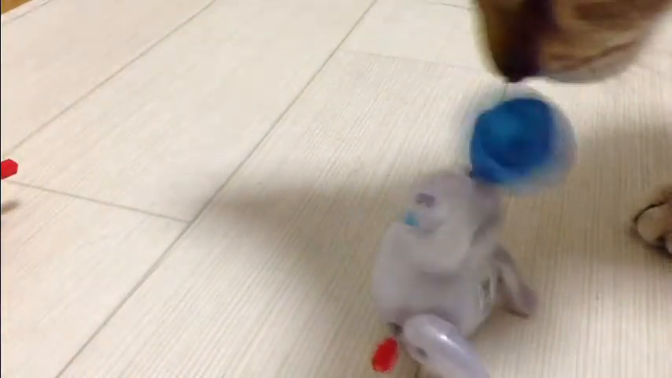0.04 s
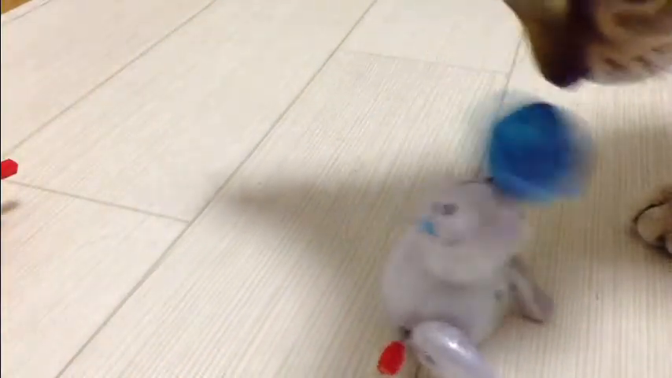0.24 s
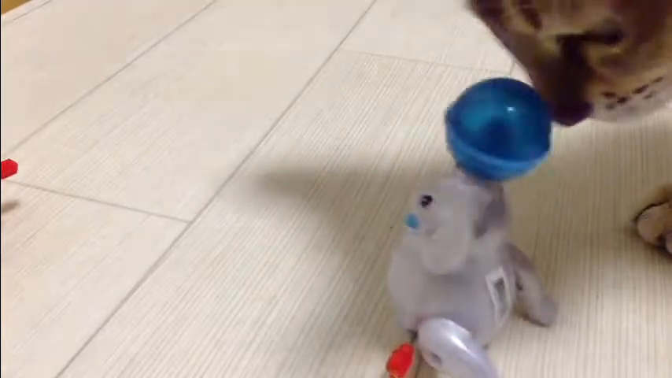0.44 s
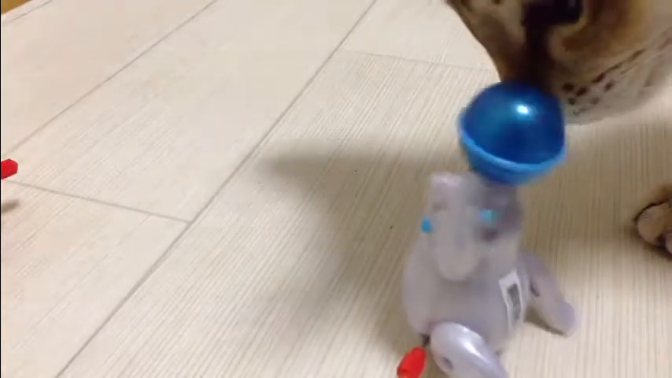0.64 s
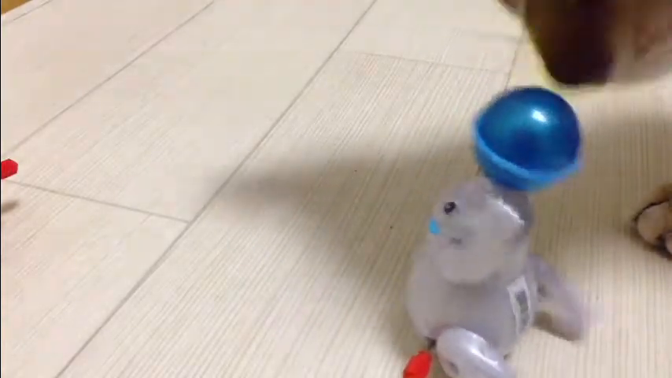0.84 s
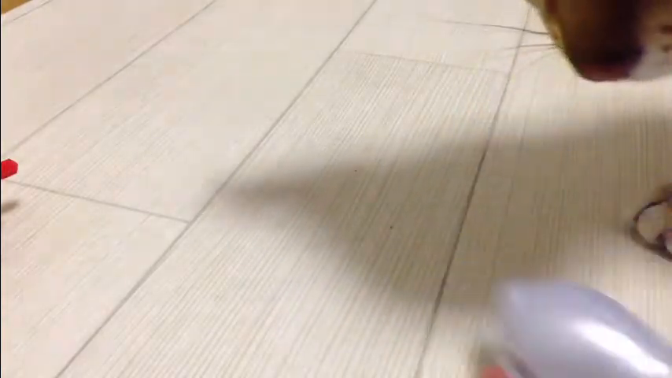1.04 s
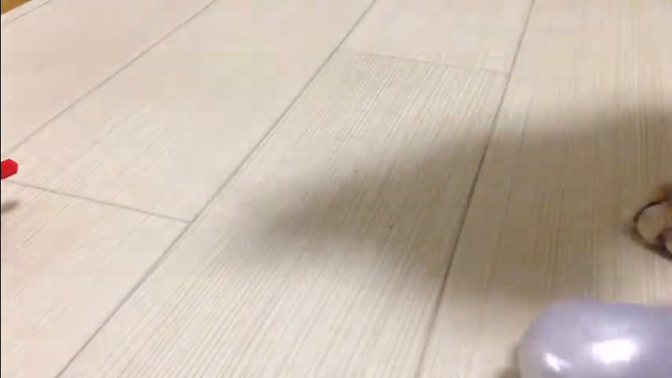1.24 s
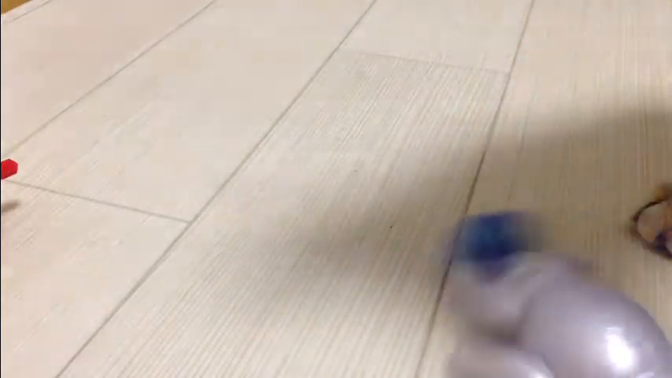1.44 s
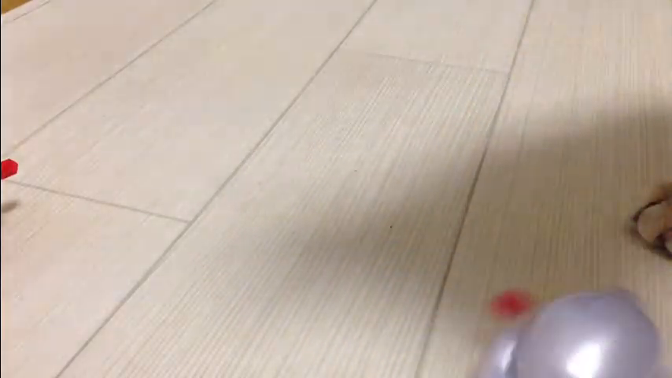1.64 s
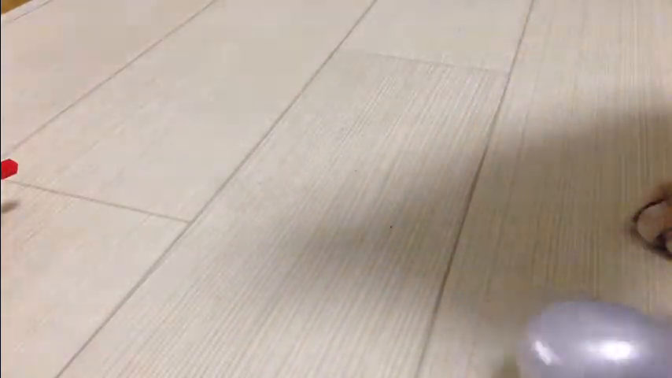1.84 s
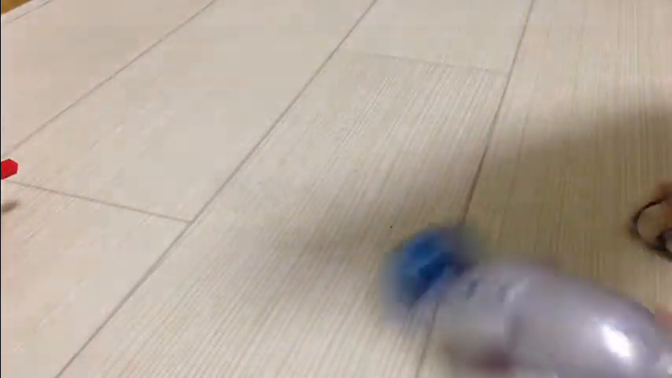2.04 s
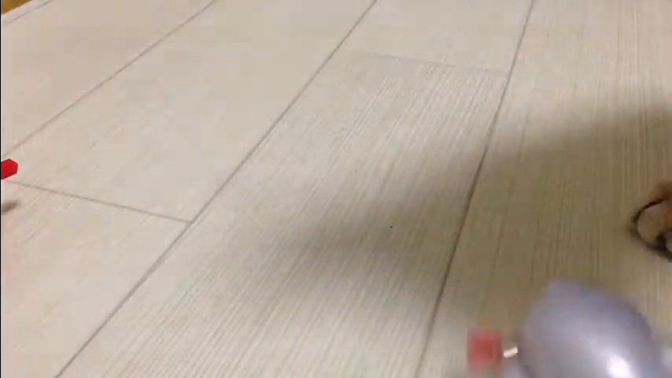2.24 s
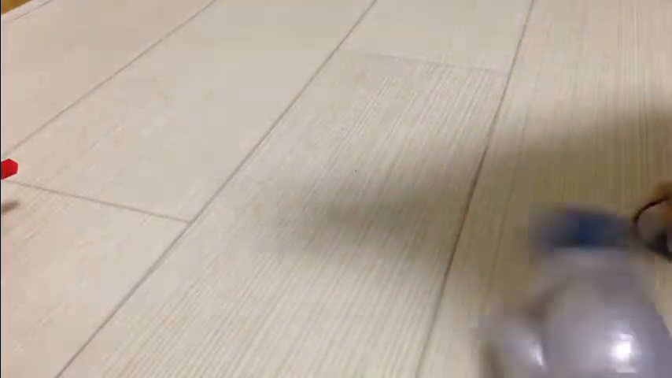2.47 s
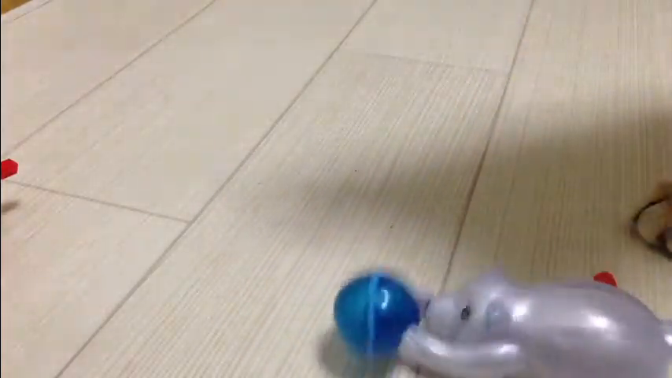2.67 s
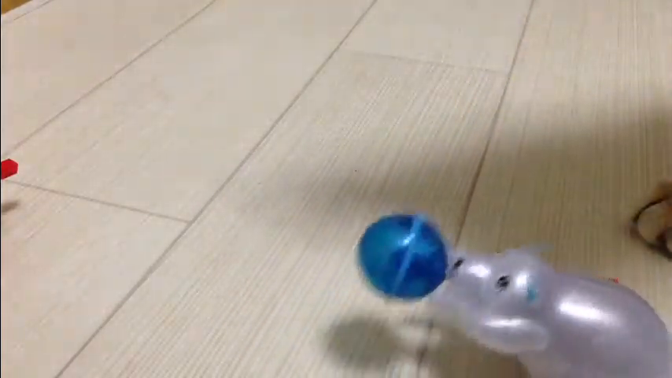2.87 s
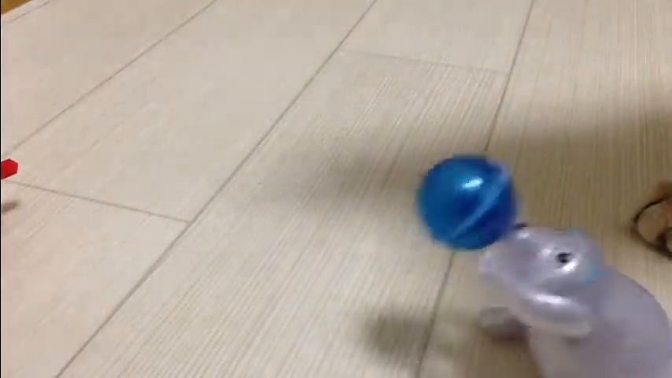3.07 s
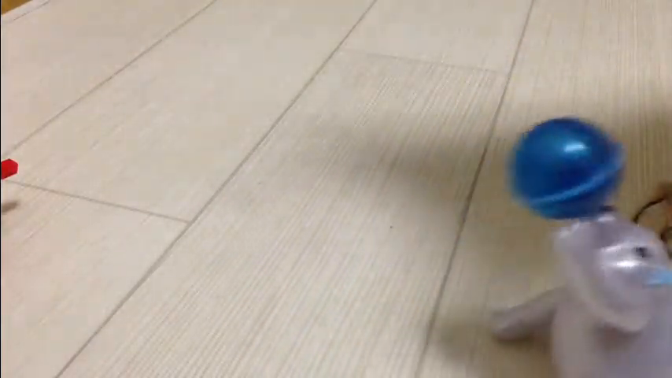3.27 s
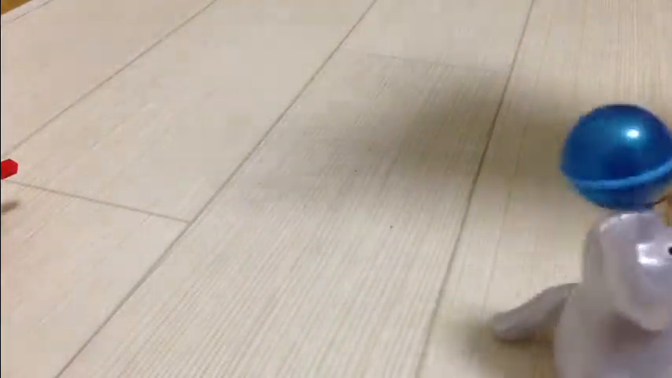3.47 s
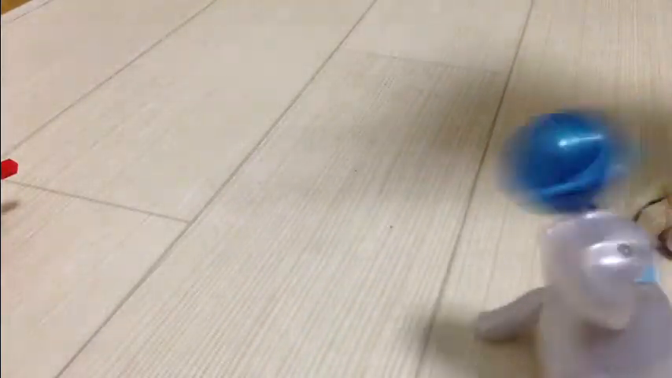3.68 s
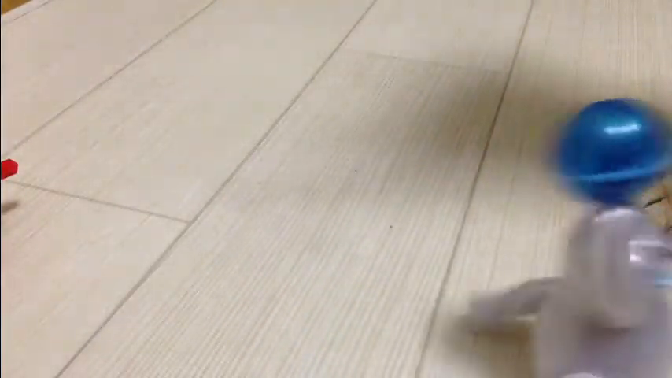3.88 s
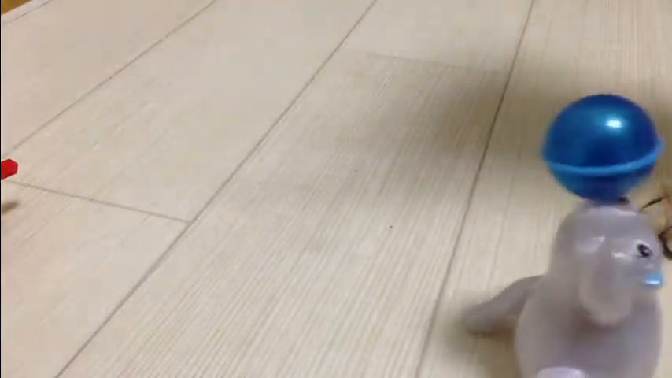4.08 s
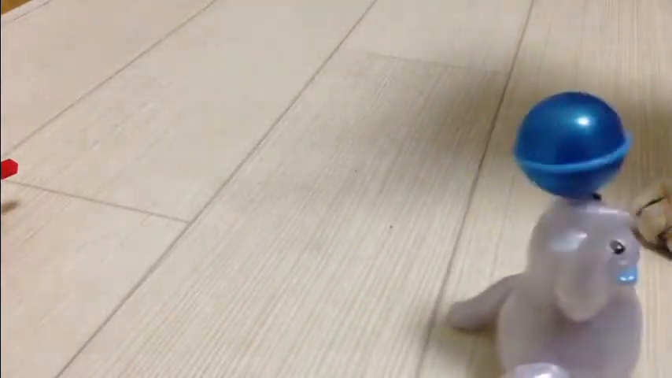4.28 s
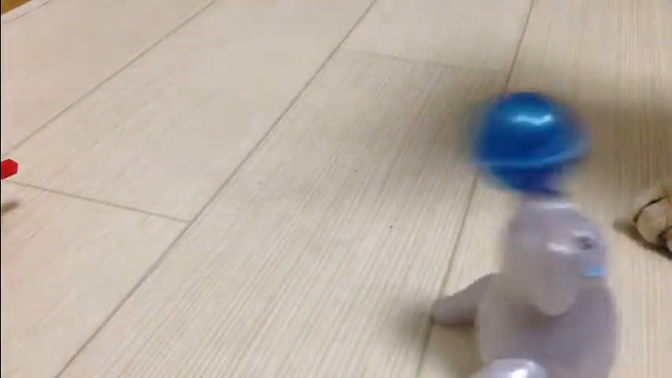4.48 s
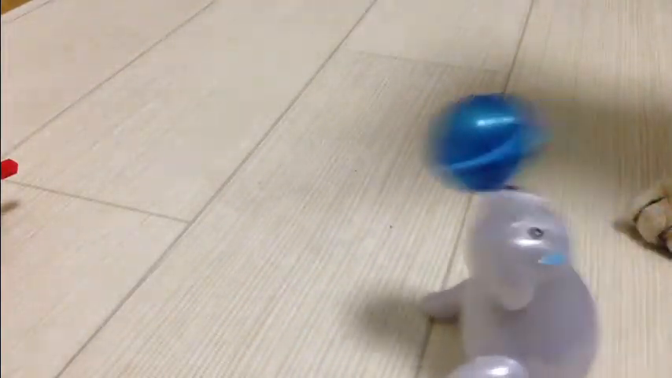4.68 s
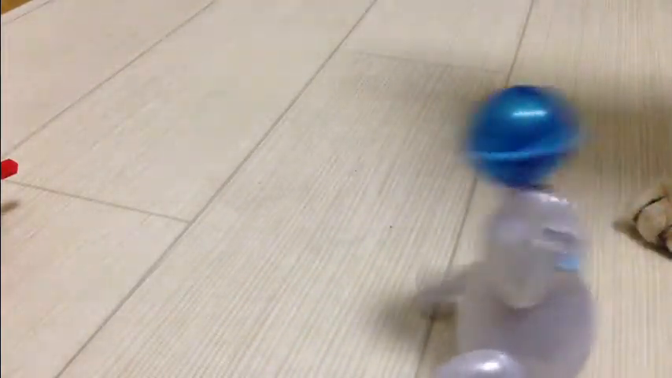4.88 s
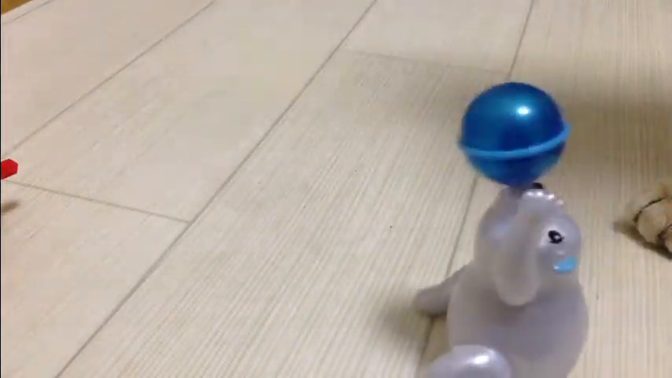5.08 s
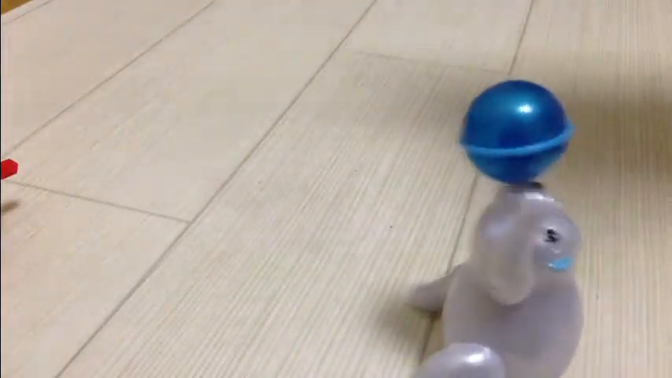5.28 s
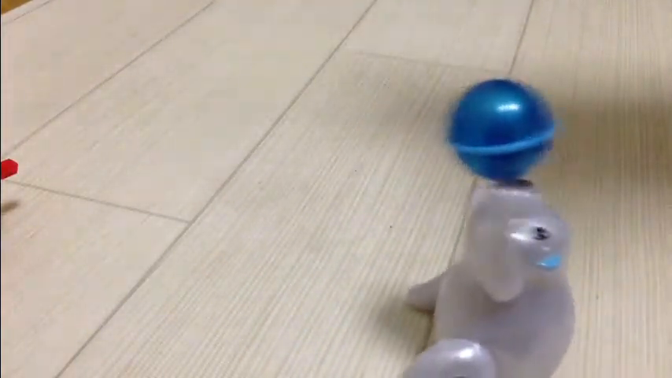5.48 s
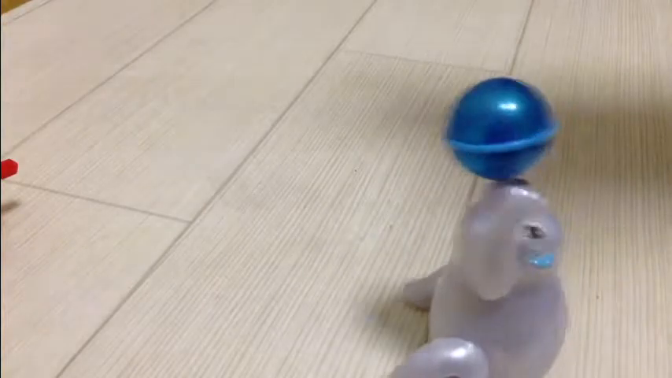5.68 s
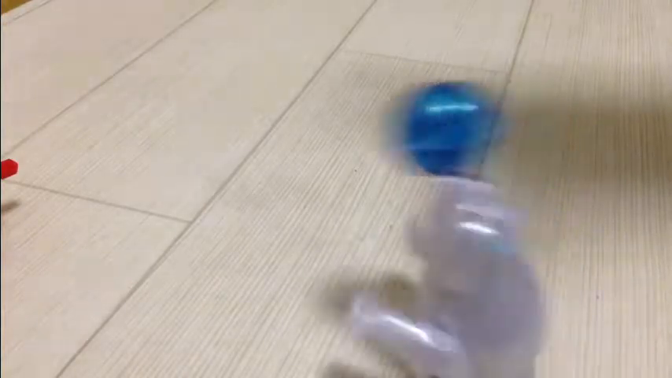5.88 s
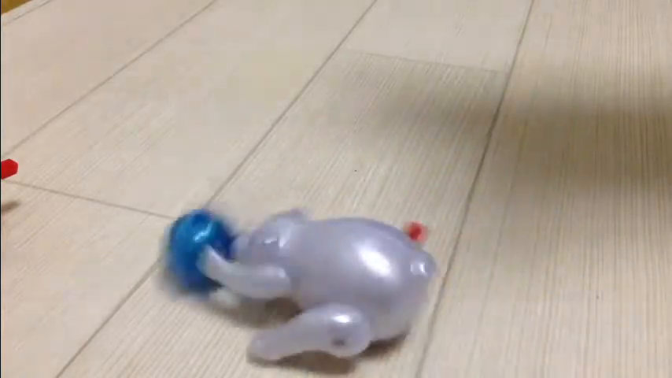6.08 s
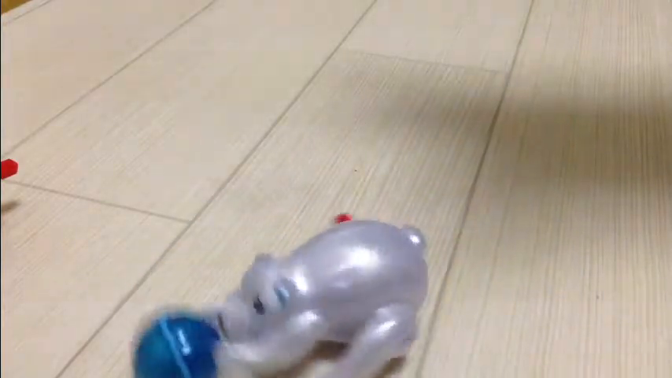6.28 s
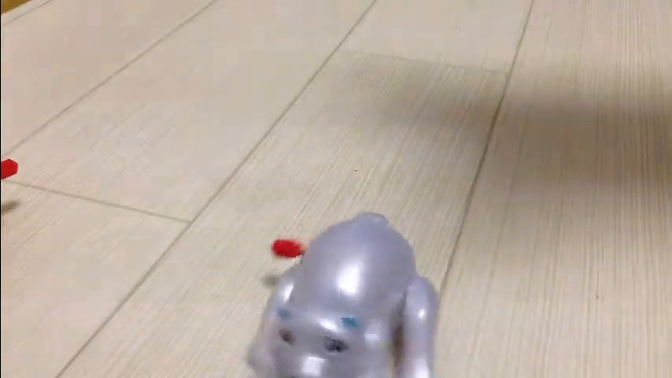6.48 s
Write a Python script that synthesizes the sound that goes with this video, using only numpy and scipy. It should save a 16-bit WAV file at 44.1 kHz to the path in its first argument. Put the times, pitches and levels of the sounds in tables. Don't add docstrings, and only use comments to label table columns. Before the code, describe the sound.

Fast, grainy gear chatter buzzes inside a hollow plastic shell, with foot taps on floorboards and bright pings. A clattering fall nearly hushes it; the whir climbs again, swells in rocking pulses as the toy sits up, and a second hard topple leaves only a thin ticking. Small quiet room, close mono phone sound with little reverberation.

```python
import sys
import numpy as np
from scipy import signal
from scipy.fft import rfft, irfft
from scipy.io import wavfile
from scipy.ndimage import uniform_filter1d

SR = 44100
rng = np.random.default_rng(int(sys.argv[2]) if len(sys.argv) > 2 else 0)


def transcribe(signal):
    frames = np.atleast_2d(signal).T
    limited = np.clip(frames, -1, 1)
    pcm = np.round(limited * 32767).astype(np.int16)
    wavfile.write(sys.argv[1], SR, pcm)


def invert_db(x):
    u = np.asarray(x, float) / 20
    return 10 ** u


N = 287532


def unit(x):
    return x / np.sqrt(np.mean(x ** 2))


def band(x, lo_hz, hi_hz, order=2):
    sos = signal.butter(order, [lo_hz, min(hi_hz, .45 * SR)], "band", fs=SR, output="sos")
    return signal.sosfilt(sos, x)


def ring(x, hz, width_hz):
    return signal.lfilter(*signal.iirpeak(hz, hz / width_hz, fs=SR), x)


def colour(x, points):
    hz, db = np.transpose(points)
    grid_hz = np.linspace(1, SR / 2, 1025)
    gain_db = np.interp(np.log(grid_hz), np.log(hz), np.maximum(db, -70))
    cepstrum = irfft(np.log(invert_db(gain_db)))
    cepstrum[1:1024] *= 2
    cepstrum[1025:] = 0
    impulse = irfft(np.exp(rfft(cepstrum)))
    return signal.oaconvolve(x, impulse)[:len(x)]


def walk(rate_hz):
    k = int(SR / rate_hz)
    held = np.repeat(rng.standard_normal(N // k + 1), k)
    return unit(uniform_filter1d(uniform_filter1d(held, k), k)[:N])


def decay(t60_s, length_s=.15):
    return np.exp(-np.log(1000) * np.arange(int(length_s * SR)) / SR / t60_s)


def hump(s, rise_s, drop_s):
    return np.interp(np.arange(N) / SR, [s - rise_s, s, s + drop_s], [0, 1, 0])


def add(out, s, sound):
    i = max(int(s * SR), 0)
    out[i:i + len(sound)] += sound[:len(out) - i]


# f/Hz, level/dB per Hz
ROOM_COLOUR = [(18, -75), (30, -29), (168, 7.5), (389, 3), (488, 9), (579, -3), (781, -15), (900, 17),
               (1170, -8), (1980, -120)]


def room_tone():
    hum = unit(colour(rng.standard_normal(N), ROOM_COLOUR))
    return hum * invert_db(-80 + 1.5 * walk(3.6))


# start t/s, end t/s, f/Hz, width/Hz, level/dB
SLIDES = [
    (1.083, 1.152, 6730, 600, -30.5),
    (6.07, 6.104, 6700, 600, -35),
]
# t/s, level/dB, T60/s
THUMPS = [
    (1.144, -66, 0.0045),
    (6.118, -69, .004),
    (0.0014, -87, .006),
]


def falls():
    out = np.zeros(N)
    for start_s, end_s, hz, width_hz, db in SLIDES:
        rub = (clicks() * rng.standard_normal(N))[:int((end_s - start_s) * SR)]
        scrape = ring(ring(rub, hz, width_hz), hz, width_hz)
        add(out, start_s, invert_db(db) * unit(scrape))
    for s, db, t60_s in THUMPS:
        add(out, s, invert_db(db) * unit(band(decay(t60_s), 26, 700, order=1)))
    return out


# t/s, peak level/dB, f/Hz
STEPS = [(0.096, -15.5, 2490), (0.169, -21.5, 2600), (0.477, -23, 2600), (0.569, -23, 3330),
         (.577, -22, 2600), (0.864, -19, 2900), (1.097, -14, 2090), (1.144, -9.5, 2680), (1.2, -24, 2800),
         (1.213, -26, 2700), (.772, -24, 2600), (.372, -30, 1800), (2.425, -31, 2700), (5.218, -34.5, 1200),
         (6.122, -25, 1490), (6.187, -30, 2000), (2.188, -31.5, 2350), (3.545, -30, 2200),
         (4.008, -22.5, 2490), (4.44, -32, 2260), (5.095, -32.5, 1480), (5.258, -21, 2390),
         (5.404, -21, 2070), (5.532, -21.5, 1870), (5.664, -19, 2050), (5.795, -19, 2170),
         (6.077, -16, 2450), (6.116, -17.5, 2800), (6.181, -25, 2370)]
# t/s, peak level/dB, f/Hz
BRUSHES = [(0.294, -25, 1850), (0.311, -20, 2650), (0.675, -21, 2330), (1.328, -37.5, 2470),
           (1.501, -37, 2480), (1.548, -32, 2450), (1.949, -33, 2570), (3.189, -30, 3200),
           (3.358, -38, 1910), (3.756, -21, 2240), (4.094, -24, 2010), (4.232, -32, 1390),
           (4.351, -31, 2130), (4.389, -26.5, 2090), (4.482, -24.5, 2170), (4.502, -23.5, 2400),
           (4.578, -29.5, 2480), (4.755, -24.5, 2250), (4.872, -32, 2180), (5.0, -24, 2330),
           (4.792, -31, 2200), (4.837, -31, 2200), (4.982, -29, 1310), (5.019, -30, 2300),
           (5.171, -39, 1900), (5.59, -39, 2200), (5.509, -32, 2270), (6.269, -41, 3260),
           (6.474, -53, 1330)]
STEP_THUD_DB, BRUSH_THUD_DB = -41, -46


def taps():
    out, t = np.zeros(N), np.arange(int(.15 * SR)) / SR
    for rows, thud_db in [(STEPS, STEP_THUD_DB), (BRUSHES, BRUSH_THUD_DB)]:
        for s, peak_db, hz in rows:
            s += .0011
            blow = -np.sin(2 * np.pi * hz * t) * t * hz * np.exp(-t * hz / 0.46)
            shell = unit(ring(rng.standard_normal(len(t)), hz, 1430)) * decay(0.022)
            boards = unit(band(rng.standard_normal(len(t)), 350, 950)) * decay(0.025)
            add(out, s, invert_db(peak_db + 15.5) * band(blow, 470, 6700))
            add(out, s, invert_db(peak_db - 14) * shell)
            add(out, s, invert_db(peak_db + thud_db) * boards)
    return band(out, 310, 14000)


# t/s, peak level/dB, f/Hz
TICKS = [(0.3276, -24, 12100), (.8655, -17, 4300), (0.4764, -11, 8920), (.5, -24, 6000),
         (1.3316, -27, 9590), (3.1701, -26, 5370), (3.2805, -22, 5100), (3.4847, -16, 12700),
         (3.7666, -17, 6220), (4.323, -30, 11500), (4.6727, -11.5, 5870), (4.8536, -21, 11550),
         (5.0438, -12.5, 11200), (5.094, -12.5, 4650), (5.1796, -14.5, 11500), (5.289, -17.5, 11500),
         (5.5093, -20, 5000), (5.5325, -14, 5600), (5.562, -12, 5700), (5.663, -15, 6000),
         (5.772, -17, 5540), (6.4296, -34, 10100), (6.4717, -31, 5560), (6.4962, -31, 5340)]
# t/s, peak level/dB, f/Hz
CRACKS = [(1.0998, -7, 6800), (1.1002, -7, 5600), (1.1445, -3, 5370), (1.1455, -4, 6600),
          (1.128, -14, 6700), (1.1975, -17, 5800), (1.212, -16, 5000), (1.203, -14, 5370),
          (1.218, -18, 7360), (6.0785, -3.5, 6300), (6.085, -14, 6500), (6.1176, -1.5, 6280),
          (6.1224, -9, 5370), (6.1374, -22, 6650), (6.1433, -24, 4890), (6.1815, -14, 6340),
          (6.1845, -12, 6100), (6.1875, -18, 5470), (6.202, -29, 6000), (6.1924, -23, 6140),
          (6.246, -36, 5030), (6.27, -36, 11500)]
TICK_T60_S, CRACK_T60_S = 0.0081, 0.0083


def ticks():
    out, swell = np.zeros(N), 1 - decay(0.006)
    t = np.arange(len(swell)) / SR
    for rows, t60_s in [(TICKS, TICK_T60_S), (CRACKS, CRACK_T60_S)]:
        for s, peak_db, hz in rows:
            noise = unit(band(rng.standard_normal(len(t)), 2660, 13400))
            crack = 1.07 * noise + 1.3 * np.sin(2 * np.pi * hz * t)
            add(out, s + .0007, invert_db(peak_db - 4) * crack * swell * decay(t60_s))
    return band(out, 1640, 19000, order=3)


# t/s, peak level/dB, f/Hz
NICKS = [(0.0542, -26, 10150), (0.187, -22, 8200), (0.7505, -21, 12600), (1.0027, -20, 5400),
         (1.249, -40, 11300), (1.2615, -44, 11150), (1.2891, -43, 11050), (1.304, -40, 9800),
         (1.3472, -31, 9300), (1.3962, -30, 11900), (1.4182, -29, 11450), (1.4426, -33, 11700),
         (1.4568, -33, 11800), (1.4723, -29, 11700), (1.481, -30, 11650), (1.5154, -36, 11000),
         (1.8679, -27, 11750), (2.2586, -30, 6940), (2.6565, -31, 11600), (2.9586, -27, 4950),
         (3.1406, -30, 8050), (3.2192, -24, 4860), (3.232, -27, 7100), (3.3591, -23, 6180),
         (3.529, -22, 6050), (3.5744, -20, 6070), (3.6515, -24, 8500), (3.6691, -23, 6000),
         (3.9816, -17, 5950), (4.0657, -20, 6100), (4.1036, -16, 10950), (4.1425, -20, 10950),
         (4.2219, -24, 12000), (4.3907, -22, 5900), (4.454, -22, 10300), (4.5934, -22, 5900),
              (4.6027, -24, 5750), (4.6159, -21, 11150), (4.6999, -26, 11100), (4.8067, -27, 10200),
              (4.9026, -24, 5950), (4.9506, -22, 5840), (5.0061, -26, 11400), (5.131, -29, 11500),
              (5.1572, -29, 12000), (5.172, -21, 5900), (5.2023, -30, 11200), (5.4694, -20, 11350),
              (5.606, -35, 6000), (5.7029, -21, 11450), (5.76, -24, 6000), (5.7852, -20, 5900),
              (5.879, -22, 5900), (5.9344, -17, 11350), (6.348, -41, 10750), (6.363, -45, 10050),
              (6.3728, -45, 5350), (6.3866, -42, 9550), (6.4008, -48, 5000), (6.4134, -41, 9250),
              (6.4568, -45, 5270), (6.4807, -42, 9800), (6.5081, -43, 5150), (6.5192, -40, 5300)]
NICK_DB, NICK_T60_S, NICK_SNAP = 2, .007, .45


def nicks():
    out, t = np.zeros(N), np.arange(int(.15 * SR)) / SR
    for s, peak_db, hz in NICKS:
        snap = NICK_SNAP * rng.standard_normal(len(t)) * decay(.004)
        ping = np.sin(2 * np.pi * hz * t) * decay(NICK_T60_S)
        add(out, s, invert_db(peak_db + NICK_DB) * (ping + snap) * (1 - decay(.002)))
    return band(out, 4000, 16000, order=3)


CLICKS_PER_S, CLICK_SPREAD_DB, CLICK_T60_S, RUB_BED = 1100, 3.3, 0.0025, 1.1


def clicks():
    hit = rng.random(N) < CLICKS_PER_S / SR
    size = invert_db(CLICK_SPREAD_DB * np.minimum(rng.exponential(size=N), 3.8))
    bursts = signal.oaconvolve(hit * size, decay(CLICK_T60_S, length_s=.02))[:N]
    return RUB_BED + unit(uniform_filter1d(bursts, size=20))


# t/s, rate/(teeth/s), clarity of single teeth/(0-1)
MESH = [(0, 800, 0), (1.2, 800, 0), (1.25, 230, .55), (1.4, 390, .55), (1.55, 510, .5), (1.7, 555, .35),
        (2, 585, .35), (2.4, 645, .35), (2.65, 620, .1), (2.74, 400, .3), (2.9, 470, .3), (3.35, 610, .25),
        (3.6, 650, 0), (6.15, 650, 0), (6.22, 192, .75), (6.52, 220, .75)]
STRIKE_PERIODS, TOOTH_SPREAD_DB = .4, 1.3


def mesh():
    s, rate_hz, clear = np.transpose(MESH)
    t = np.arange(N) / SR
    teeth = np.cumsum(np.interp(t, s, rate_hz) * (1 + 0.0125 * walk(25))) / SR
    size = invert_db(TOOTH_SPREAD_DB * rng.standard_normal(N // 10))[teeth.astype(int)]
    clear = np.interp(t, s, clear)
    strike = uniform_filter1d(unit(size * np.exp(-(teeth % 1) / STRIKE_PERIODS)), size=12)
    return 1 - clear + clear * strike


# t/s, level/dB
GEAR_LEVEL = [(0, -29.5), (1.05, -26.5), (1.148, -23.5), (1.168, -36), (1.275, -49), (1.48, -40), (1.7, -36),
              (2.25, -35), (2.64, -34.5), (2.72, -38), (3.06, -33.5), (3.32, -34), (3.6, -31.5), (6.04, -33),
              (6.124, -28.5), (6.165, -40.5), (6.27, -57.5), (6.52, -53.5)]
# crest t/s, swell level/dB
ROCKS = [(.1, 5.5), (.3, 3.5), (.48, 2), (.59, 1.5), (.78, 2), (3.48, 5), (3.765, 2.5), (4.02, 4.5),
         (4.25, 5), (4.46, 3.5), (4.78, 4), (5.01, 4), (5.26, 1), (5.41, 3.5), (5.54, 2), (5.67, 2.5),
         (5.81, 2), (6.02, 4)]
# t/s, dip level/dB
STALLS = [(.15, 0.5), (.365, -2), (1.63, -1.5), (2.05, -2), (2.76, -1), (2.82, -3.5), (2.87, -0.5),
          (.635, 0), (2.99, -3), (3.12, -5), (3.16, -11), (3.27, -1), (3.83, -0.5), (4.08, 0.5),
          (4.31, -0.5), (4.57, -4), (4.64, -2), (4.835, -4.5), (5.07, -2.5), (5.31, -1), (5.71, -1.5),
          (5.86, -3)]
# t/s, swell level/dB
BOUNCES = [
    (1.2, 10),
    (6.186, 17),
]
ROCK_RISE_S, ROCK_DROP_S = 0.097, 0.037
STALL_IN_S, STALL_OUT_S = 0.04, 0.039
BOUNCE_RISE_S, BOUNCE_DROP_S = .004, 0.039


def effort():
    db = np.interp(np.arange(N) / SR, *np.transpose(GEAR_LEVEL))
    for rows, rise_s, drop_s in [(ROCKS, ROCK_RISE_S, ROCK_DROP_S), (STALLS, STALL_IN_S, STALL_OUT_S),
                                 (BOUNCES, BOUNCE_RISE_S, BOUNCE_DROP_S)]:
        db = db + sum(swell_db * hump(s, rise_s, drop_s) for s, swell_db in rows)
    return db


# foot, belly, lower shell, upper shell, teeth level/dB
PARTS = [
    (-32, -14.5, -13, -8.5, -2),
    (-35, -11, -6.5, -4.5, 0.5),
    (-33, -15, -8.5, -4.5, -2),
    (-37.5, -13.5, -9, -6.5, -1),
    (-32, -5, -7, -3, 1.5),
]
# t/s, half length/s, swell level/dB
DRUMS = [(.3, 0.088, 0.5), (0.723, 0.087, -3), (1.6, 0.054, 5), (1.85, 0.15, 9.5), (2.205, 0.075, 9),
         (2.4, 0.089, 11), (2.673, 0.042, 12.5), (2.98, .2, -5), (3.45, .1, 0), (3.815, 0.079, 4.5),
         (4.03, 0.06, -1), (4.498, .07, 1.5), (4.76, 0.054, 1.5), (5.02, .06, 0), (5.616, 0.059, 0),
         (6.3, 0.09, 2)]
# t/s, half length/s, belly, lower shell, upper shell level/dB
TURNS = [(1.12, 0.16, 3, 4.5, 2), (1.71, 0.15, 1, 3, 3.5), (1.86, 0.065, 1, -1, 3.5), (2.4, 0.16, 0, -1, 3),
         (2.52, 0.11, -3, 1.5, -5.5), (2.5, 0.053, 4, -1, 4), (6.098, 0.093, 2.5, 4.5, -2.5),
         (0.586, 0.028, 3, 2, 6.5), (1.7, 0.075, -5.5, -2.5, -3.5), (6.52, 0.35, -6.5, 4, 0),
         (3.4, 0.08, 0, 2.5, 0), (5.4, 0.095, -3.5, -2.5, -2.5), (0.96, .06, 1.5, 0, 2)]


def facing(posture):
    db = uniform_filter1d(np.array(PARTS, float)[posture].T, size=2000)
    db[0] += sum(swell_db * hump(s, half_s, half_s) for s, half_s, swell_db in DRUMS)
    return db + sum(np.outer([0, *side_db, 0], hump(s, half_s, half_s)) for s, half_s, *side_db in TURNS)


PINGS_PER_S, PING_T60_S = 300, .04


def pings(modes, posture):
    out, t = np.zeros(N), np.arange(int(.06 * SR)) / SR
    fade = decay(PING_T60_S, length_s=.06)
    for when, pick, detune, size in rng.random((int(PINGS_PER_S * N / SR), 4)):
        hz, width_hz, *boost_db = modes[int(pick * len(modes))]
        db = boost_db[posture[int(when * N)]] + 9 * size
        tone = np.sin(2 * np.pi * (hz + 1.71 * width_hz * (detune - .5)) * t)
        add(out, when * N / SR, invert_db(db) * tone * fade)
    return unit(out)


# f/Hz, level/dB per Hz
GEAR_COLOUR = [(88, -52), (150, -48), (540, -36.5), (628, -25), (705, -19.5), (1150, -4), (1650, -10),
               (2250, -4.5), (3070, -4), (5930, -5), (7920, -6.5), (11700, -8.5), (15300, -9)]
POSTURE_S = [
    1.17,
    2.68,
    3.33,
    6.212,
]
# f/Hz, width/Hz, boost level/dB sitting, lying, rising, sitting again, lying again
SHELL = [(639, 78, -16, -12, -25, 8, 6), (1350, 170, -1, -13, -17, -2.5, -12),
         (2240, 225, 3.5, 2.5, 4, 3, -17), (2600, 156, -3, 0.5, -1, -5.5, -11),
         (1504, 184, -20, -2.5, -2, -8.5, -10), (1819, 245, 0, -1.5, 1, 2, -5),
         (4510, 150, -15, -12, -8, -32, -31), (5153, 526, -3, -3.5, -6, 3, -5),
         (6000, 300, -2, -16.5, -26, 2.5, -15), (7140, 745, -37, -5.5, 0.5, -5, -15),
         (8850, 670, -0.5, 3, -5.5, -2.5, 7), (10150, 670, 0, 1.5, 1, 0.5, 7),
         (11350, 540, -11, 0, -4, 2, -1), (12460, 1670, 2.5, 4.5, 2.5, 1.5, 4)]
PING_DB, SHARED_CLICKS = -12, .75


def gears():
    posture = np.searchsorted(POSTURE_S, np.arange(N) / SR)
    foot_db, belly_db, lower_db, upper_db, teeth_db = effort() + facing(posture)
    tooth = mesh()
    common, chatter_db, out = clicks(), .3 * walk(90), 0
    for lo_hz, hi_hz, db in [(120, 930, foot_db), (930, 3900, belly_db), (3850, 5700, lower_db),
                             (5700, 8700, upper_db), (8700, 17000, teeth_db)]:
        modes = [mode for mode in SHELL if lo_hz < mode[0] < hi_hz]
        teeth = SHARED_CLICKS * common + (1 - SHARED_CLICKS) * clicks()
        teeth = teeth ** (.8 if lo_hz > 3000 else .55)
        flutter = invert_db(chatter_db + .3 * walk(45))
        x = colour(tooth * teeth * rng.standard_normal(N) * flutter, GEAR_COLOUR)
        for hz, width_hz, *boost_db in modes:
            open_db = uniform_filter1d(np.array(boost_db, float)[posture], size=2000) + 1.3 * walk(14)
            resonance = ring(ring(x, hz, 2.1 * width_hz), hz, 2.1 * width_hz)
            x = x + invert_db(open_db - 5.5) * resonance
        x = unit(x) + invert_db(PING_DB) * pings(modes, posture)
        x = band(x, lo_hz, hi_hz, order=4)
        out = out + x / np.sqrt(uniform_filter1d(x ** 2, size=4000)) * invert_db(db)
    return out


# t/s, half length/s, f/Hz, width/Hz, level/dB
GLINTS = [(1.37, 0.16, 4500, 1200, -7), (1.36, 0.13, 1700, 1200, 0.5), (2.46, 0.33, 400, 120, 2),
          (0.26, 0.066, 9300, 700, 3.5), (1.14, 0.12, 1100, 370, -4), (5.9, .15, 5100, 530, -3),
          (1.385, 0.15, 4800, 630, 8.5), (1.79, 0.094, 5300, 650, 6.5), (2.04, 0.093, 5000, 600, 6),
          (2.24, 0.069, 7400, 1900, 5.5), (2.335, .12, 5260, 640, 6.5), (2.8, 0.086, 7200, 1100, 0),
          (2.9, 0.046, 6200, 1200, -7), (2.3, 0.05, 3000, 710, -5), (1.67, 0.065, 2700, 630, 0),
          (2.3, 0.099, 11600, 1200, 3), (1.9, 0.074, 11000, 900, 4), (1.42, .08, 11600, 900, 6.5),
          (3.02, 0.23, 1900, 360, 0.5), (3.8, 0.05, 4100, 1700, 3), (3.8, 0.3, 3400, 730, -2.5),
          (5.3, .12, 4000, 900, 0.5), (3.7, 0.088, 6050, 350, 3), (1.8, .05, 8000, 1200, 2.5),
          (4.8, 0.072, 6000, 420, 3), (3.7, 0.038, 1400, 620, 6), (4.25, .1, 3300, 810, -0.5),
          (4.9, 0.084, 1000, 600, 1), (4.4, 0.11, 3800, 1600, -3), (6.1, 0.063, 1900, 1200, -4),
          (5.2, 0.19, 3500, 1600, -4), (5.95, 0.14, 5200, 550, 3), (0.4, 0.066, 12700, 1200, 4),
          (0.59, 0.034, 8800, 900, 4), (.85, 0.054, 12000, 1500, 1), (0.28, .15, 2900, 900, 0.5),
          (0.69, 0.13, 3600, 900, 0.5), (6.44, 0.12, 5350, 500, 4), (6.3, .08, 1900, 900, -3),
          (6.1, 0.027, 6400, 1800, 3),
          (2.1, 0.047, 3500, 900, 5), (2.42, .06, 2700, 990, 5), (2, 0.04, 1400, 400, 3),
          (2.1, 0.077, 1000, 300, 6), (2.05, 0.15, 950, 460, -12), (2.55, 0.079, 800, 400, -7),
          (4.6, 0.071, 6000, 300, 5.5), (3.77, .03, 4400, 400, 6.5), (4.44, .04, 5200, 360, 3),
          (.8, 0.087, 1300, 340, 2), (2.85, .12, 8400, 500, -4), (2.9, .1, 6800, 500, 4),
          (2.4, 0.088, 3000, 700, 0), (2.4, 0.06, 6400, 1000, 4), (2.8, .05, 12000, 1500, 5),
          (1.38, .14, 3400, 900, -2), (1.7, 0.081, 10600, 900, 4), (5.85, .1, 10000, 2500, 3),
          (2.25, .05, 300, 250, 5), (5.4, 0.05, 1500, 300, 6), (1.6, 0.092, 500, 200, 5),
          (4.88, .05, 1100, 300, 5), (6.9, .1, 6800, 900, 4), (3.53, .2, 3130, 800, -4),
          (4.35, 0.12, 3200, 690, -2), (1, .1, 2900, 700, -2.5), (1.12, .06, 750, 250, -4),
          (3.57, .25, 350, 230, -5), (5.95, 0.11, 400, 250, -7)]


def glints(x):
    out = x.copy()
    for s, half_s, hz, width_hz, db in GLINTS:
        a, b = max(int((s - half_s) * SR), 0), int((s + half_s) * SR)
        part = x[a:b]
        swing_db = db * np.sin(np.linspace(0, np.pi, len(part)))
        out[a:b] += (invert_db(swing_db) - 1) * ring(part, hz, width_hz)
    return out


def scene():
    hits = taps() + ticks() + nicks()
    tail = rng.standard_normal(int(.15 * SR)) * decay(.04)
    tail = tail / np.sqrt(np.sum(tail ** 2))
    wet = signal.oaconvolve(band(hits, 550, 24000), tail)[:N]
    mono = glints(gears()) + hits + invert_db(-10.5) * wet + falls() + room_tone()
    return np.array([mono, mono])


def limit(x, ceiling=.42):
    return x + band(ceiling * np.tanh(x / ceiling) - x, 700, 19000, order=3)


# t/s, share/(0-1)
DROPOUT = [(0, .05), (1.15, .05), (1.25, .3), (1.9, .22), (2.6, .2), (2.9, .32), (3.2, .25), (3.4, .07),
           (4.9, .09), (5.3, .2), (6, .12), (6.25, .35), (6.52, .4)]
DROP_FROM_HZ, DROP_FULL_HZ, DROP_DB = 12000, 13600, -22


def starve(x):
    hz, s, cells = signal.stft(x, SR, nperseg=1024)
    luck = rng.random((len(hz) // 4 + 1, len(s) // 4 + 1))
    luck = np.repeat(np.repeat(luck, 4, axis=0), 4, axis=1)[:len(hz), :len(s)]
    treble = np.interp(hz, [DROP_FROM_HZ, DROP_FULL_HZ], [0, 1])
    share = np.outer(treble, np.interp(s, *np.transpose(DROPOUT)))
    cells = cells * np.where(luck < share, invert_db(DROP_DB), 1)
    return signal.istft(cells, SR, nperseg=1024)[1][..., :N]


def band_limit(x):
    return signal.sosfilt(signal.butter(12, 15380, fs=SR, output="sos"), x)


def record(dry):
    top_cut = signal.ellip(10, .2, 80, 15300, fs=SR, output="sos")
    mix = signal.sosfilt(top_cut, starve(limit(dry)))
    return band_limit(mix)


dry = scene()
out = record(dry)
transcribe(out)
```